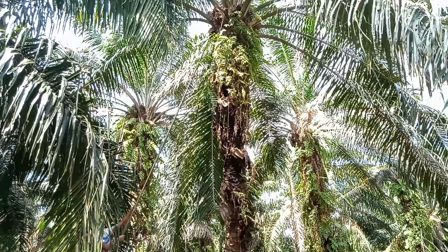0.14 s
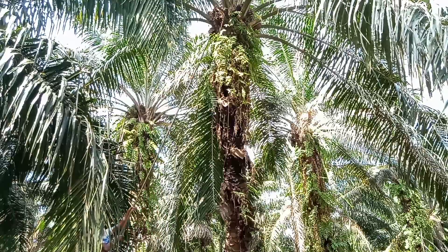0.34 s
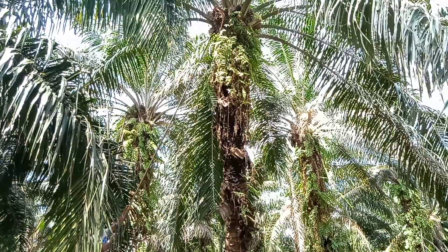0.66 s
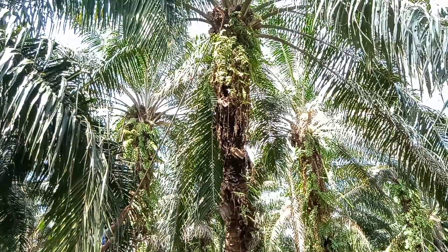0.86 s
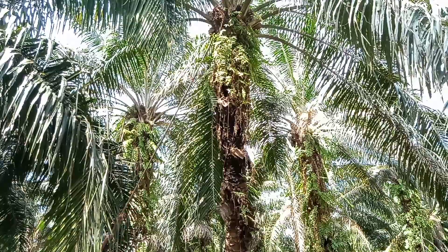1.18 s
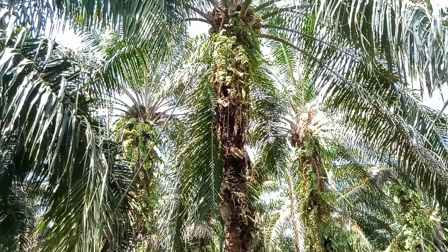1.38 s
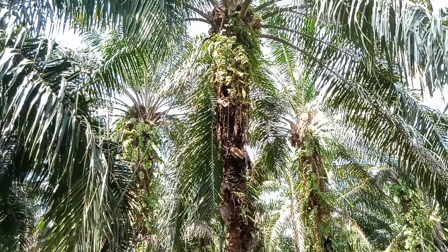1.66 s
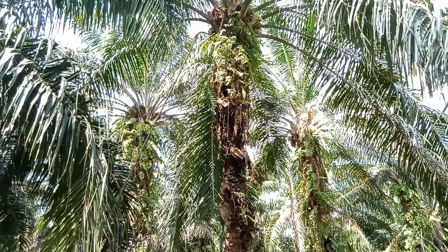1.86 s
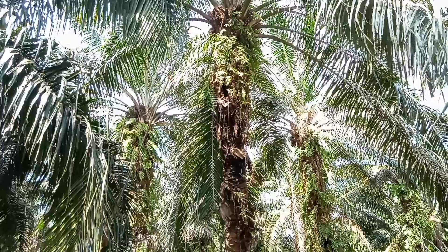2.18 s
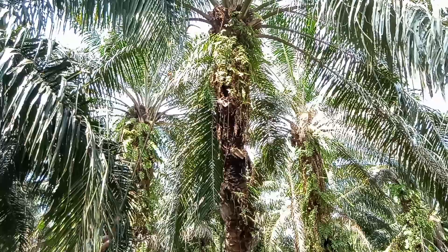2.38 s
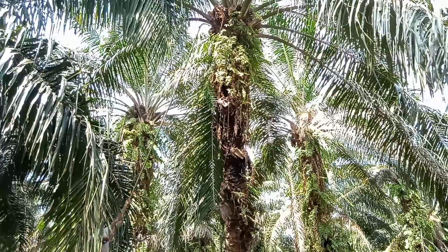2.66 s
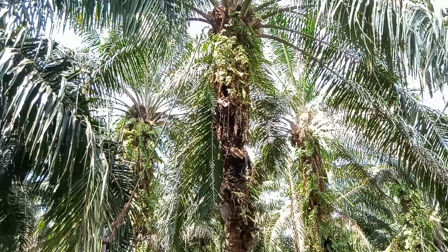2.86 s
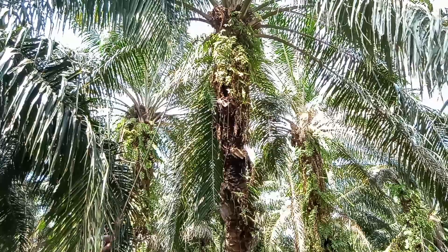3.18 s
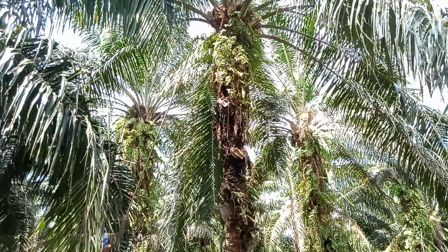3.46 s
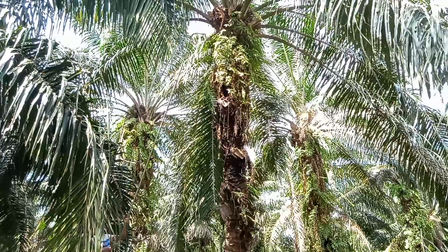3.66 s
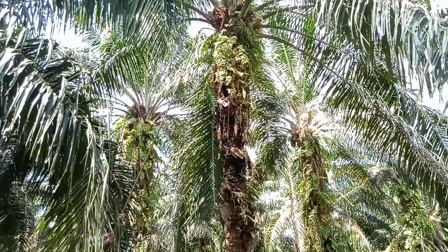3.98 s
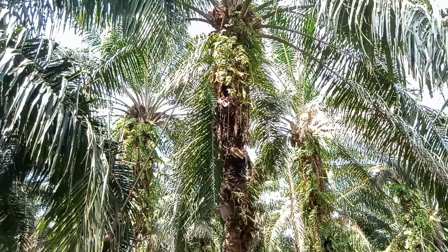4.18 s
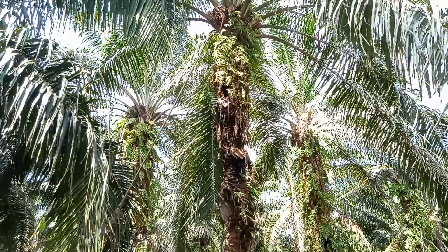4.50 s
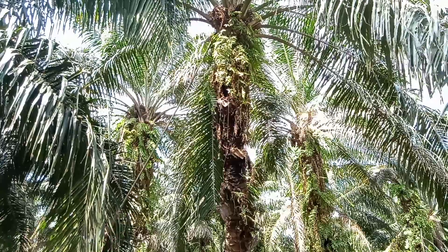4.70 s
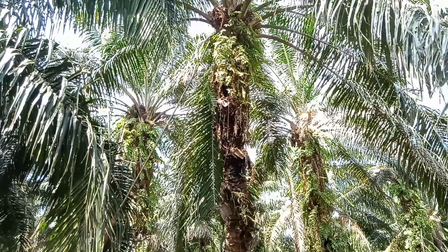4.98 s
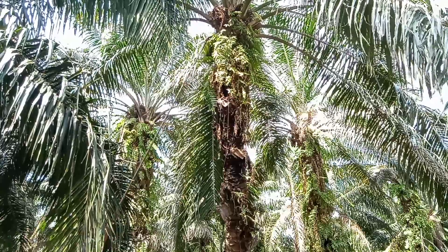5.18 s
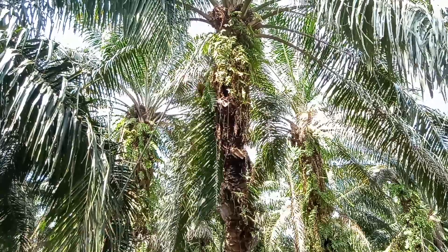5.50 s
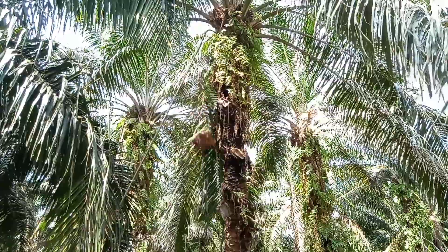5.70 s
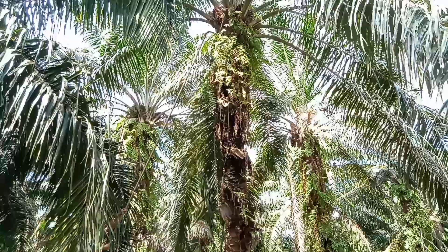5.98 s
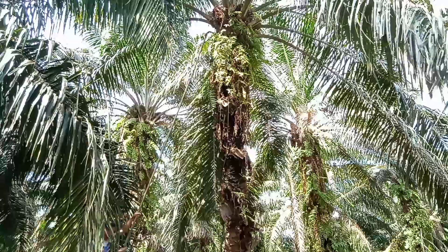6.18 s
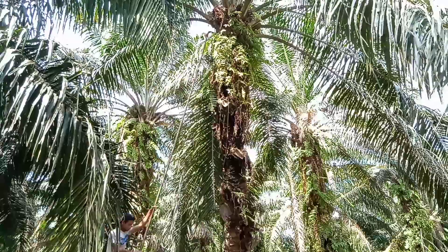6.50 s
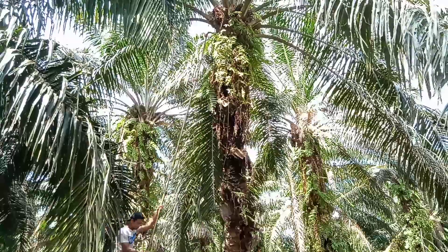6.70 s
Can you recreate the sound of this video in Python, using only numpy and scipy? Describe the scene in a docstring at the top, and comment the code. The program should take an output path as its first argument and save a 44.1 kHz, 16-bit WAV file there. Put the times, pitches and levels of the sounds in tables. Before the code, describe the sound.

Short rasping cuts and knocks in a palm end in falling leaves and a thud, while insects drone shrilly outdoors.

```python
"""Insects drone while a pole sickle rips through fibrous stalks high in an oil palm, in short tugs.
Fibres rasp and snap, the stalk rings, the pole knocks; a few thin chirps sound in between.
Cut fronds swish down through the crown and a fruit bunch thuds onto soft soil.
The plantation scatters the cutting and rustling back to a small, bright microphone."""
import sys
import numpy as np
from scipy import signal
from scipy.fft import rfft, irfft
from scipy.io import wavfile
from scipy.ndimage import uniform_filter1d

SR = 44100
rng = np.random.default_rng(int(sys.argv[2]) if len(sys.argv) > 2 else 0)


def generate_wav(signal):
    """Clip the signal to [-1, 1] and save it as 16-bit WAV at the path in sys.argv[1]."""
    frames = np.transpose(np.atleast_2d(signal))
    scaled = np.clip(frames, -1, 1) * 32767
    pcm = np.round(scaled).astype(np.int16)
    wavfile.write(sys.argv[1], SR, pcm)


N = 302085
TIME = np.arange(N) / SR

# woody stalk spectrum (frequency [Hz], level [dB])
STALK_SPECTRUM = [(250, -33.5), (480, -18.5), (680, -1.5), (820, 0), (1050, 0), (1350, 2.5), (1750, -3.5),
                  (2400, -6.5), (4500, -38)]
# tearing fibre spectrum (frequency [Hz], level [dB])
RASP_SPECTRUM = [(300, -17.5), (900, -6), (1800, -1.5), (3400, -6), (6500, -4.5), (10000, 0.5), (15500, -7)]
# shaking frond spectrum (frequency [Hz], level [dB])
SHUDDER_SPECTRUM = [(35, -40), (80, -6.5), (130, -2), (205, 0), (310, -2), (450, -5.5), (700, -14.5),
                    (1500, -43.5)]


def gain_of(db):
    """Decibels to amplitude."""
    return 10 ** (np.asarray(db) / 20)


def unit_rms(x):
    """Scales to rms 1."""
    return x / np.sqrt(np.mean(x ** 2) + 1e-20)


def at_hz(points, hz):
    """Interpolates a table on a log-frequency axis."""
    f, value = np.transpose(points)
    return np.interp(np.log(hz + 1), np.log(f + 1), value)


def envelope(times_s, db):
    """Gain along a dB curve, silent outside it."""
    return gain_of(np.interp(TIME, times_s, db, left=-120, right=-120))


def add(mix, at_s, sound):
    """Mixes a sound in, in place."""
    part = mix[round(at_s * SR):][:len(sound)]
    part += sound[:len(part)]


def colour(x, spectrum, keep_power=True, size=4096):
    """Minimum-phase filter; by default keeps the power of white noise."""
    log_gain = np.log(gain_of(at_hz(spectrum, abs(np.fft.fftfreq(size, 1 / SR)))))
    taps = np.fft.ifft(np.exp(np.conj(signal.hilbert(log_gain)))).real[:size // 2]
    return signal.oaconvolve(x, taps / np.linalg.norm(taps) if keep_power else taps)[:N]


def wander(cutoff_hz):
    """Smooth random drift, rms 1."""
    hz = np.fft.rfftfreq(N, 1 / SR)
    return unit_rms(irfft(rfft(rng.standard_normal(N)) / (1 + (hz / cutoff_hz) ** 4), N))


def crackle(per_s, spread_db):
    """Tiny random fractures, a few much larger than the rest."""
    size = gain_of(spread_db * np.minimum(rng.exponential(1, N), 4))
    return unit_rms(size * rng.choice([-1, 1], N) * (rng.random(N) < per_s / SR))


def patchy(x, depth_db, size=256):
    """Briefly lifts and lowers random narrow bands; output rms 1."""
    bands = signal.stft(x, nperseg=size)[2]
    field = uniform_filter1d(rng.standard_normal(bands.shape), size=3, axis=0)
    field = unit_rms(uniform_filter1d(field, size=7, axis=1))
    bands = bands * gain_of(depth_db * np.minimum(field, 1.8))
    return unit_rms(signal.istft(bands, nperseg=size)[1][:N])


def insects_and_air(throb_db=0.6, pulse_db=2.0, fade_db_per_s=88):
    """Distant insects merge into a shrill band; a nearer one sings in phrases over murmuring air."""
    # air and distant chorus spectra (frequency [Hz], density [dB/Hz])
    air_spectrum = [(20, -93), (80, -75.5), (250, -84), (500, -91), (1200, -88.5), (1650, -89.5),
                    (2200, -101), (3500, -102), (6500, -107), (16000, -112)]
    chorus_spectrum = [(5900, -125), (6850, -93.5), (7400, -69), (8000, -67), (8550, -70.5), (9100, -79),
                       (10300, -87), (12000, -102), (14200, -101), (15100, -82), (15800, -78)]
    # chorus swell (time [s], gain [dB])
    swell = [(0, 0), (2, 0), (3.5, 2.5), (6.85, 2)]
    # near insect's spectrum (frequency [Hz], level [dB])
    song_spectrum = [(4700, -35), (5350, -7.5), (5600, 2), (5780, 3), (5920, -2), (6200, -23)]
    # its phrases (start [s], length [s], level [dB])
    phrases = [(0, 0.73, -64.5), (1.2, .35, -65.5), (2.7, 0.69, -59), (3.8, 0.52, -62.5), (4.8, 3.8, -55)]
    air, chorus, singer = rng.standard_normal((3, N))
    per_hz = np.sqrt(SR / 2)
    air = colour(per_hz * patchy(air, depth_db=5.5, size=1024), air_spectrum, keep_power=False)
    chorus = patchy(chorus, depth_db=1.0) * envelope(*np.transpose(swell))
    chorus *= gain_of(throb_db * wander(60))
    chorus = colour(per_hz * chorus, chorus_spectrum, keep_power=False)
    phrasing = sum(gain_of(db - fade_db_per_s * abs(TIME - np.clip(TIME, at_s, at_s + length_s)))
                   for at_s, length_s, db in phrases)
    singer = patchy(singer, depth_db=9.5, size=2048) * phrasing * gain_of(pulse_db * wander(30))
    return air + chorus + colour(singer, song_spectrum)


def stroke(t, length_s, rise_share, t60_s):
    """Strain builds, holds while fibres give way, and lets go."""
    rise = np.minimum(t / (rise_share * length_s), 1)
    return rise * gain_of(-60 * np.maximum(t - length_s, 0) / t60_s)


def resonate(x, hz, width_hz):
    """Resonance following the curve hz."""
    carrier = np.exp(2j * np.pi * np.cumsum(hz) / SR)
    pole = np.exp(-np.pi * width_hz / SR)
    return (carrier * signal.lfilter([1], np.poly([pole, pole]), x / carrier)).real


def disperse(x, lag_s=0.00892):
    """Low bending waves travel slower, so the bass leaves the frond late."""
    hz = np.fft.rfftfreq(N, 1 / SR)
    delay_s = lag_s * np.maximum(np.sqrt(1000 / (hz + 100)) - 1, 0)
    return irfft(rfft(x) * np.exp(-2j * np.pi * np.cumsum(delay_s) * SR / N), N)


def rips(sag_per_s=6.45, hollow_db=-3.0, wood_db=-7, shake_db=-26, recoil_s=0.049, recoil_db=-17):
    """Tearing fibres rasp, shake the frond and ring the stalk, whose pitch sags as the cut opens."""
    # torn or crushed fibre (time [s], length [s], force [dB], rasp re force [dB], stalk pitch [Hz])
    tugs = [(0.406, 0.016, -39.5, -7.5, 1110), (0.571, 0.028, -31, -9.5, 1064),
            (0.624, .022, -43.5, -22, 1630), (0.774, 0.033, -39, -5.5, 1750),
            (0.8, 0.036, -26.5, -13.5, 1060), (0.97, .011, -40, -17, 1000), (1.05, .016, -43.5, -33, 1190),
            (1.12, 0.03, -36.5, -14, 1190), (1.567, 0.032, -24.5, -5, 955), (1.579, 0.055, -20, -1.5, 1256),
            (1.637, 0.019, -12, -2, 1100), (1.651, .085, -21, 2, 1440), (1.738, 0.052, -27, 1.5, 1140),
            (1.82, 0.035, -30, -6, 1220), (1.904, 0.016, -32, -6, 1220), (1.923, 0.011, -25.5, -3.5, 1270),
            (2.674, 0.015, -30.5, -12.5, 826), (2.727, 0.042, -32.5, -8, 1160),
            (2.801, .045, -32, -8.5, 1070), (2.862, 0.03, -47.5, 10.5, 760),
            (2.952, 0.052, -26.5, -14, 1045), (2.975, .035, -33, 3, 935), (3.011, 0.032, -18.5, -19, 870),
            (3.179, 0.065, -28, -10, 930), (3.33, 0.022, -31, -16, 970), (4.146, 0.041, -46, 14.5, 1810),
            (4.277, 0.072, -47, -4, 1590), (4.699, 0.027, -29.5, -5, 1164), (4.742, 0.037, -32.5, -9, 1225),
            (4.914, 0.023, -44, -25, 1270), (5, 0.033, -20, -3, 900), (5.014, 0.057, -12.5, -4.5, 1253),
            (5.069, 0.0052, -7.5, -2.5, 1355), (5.543, 0.057, -24.5, -5, 1190),
            (5.676, 0.024, -26, -10, 1260), (6.129, 0.028, -24.5, 11, 760), (6.511, 0.034, -34, 5.5, 760)]
    # jolts of the heavy frond or bunch (time [s], length [s], level [dB])
    jolts = [(0.8, .038, -44.5), (1.124, 0.041, -43.5), (1.594, .035, -35), (1.635, 0.015, -24),
             (1.66, .08, -30.5), (1.737, 0.041, -37.5), (2.672, 0.02, -36.5), (3.195, 0.094, -36.5),
             (4.142, 0.032, -47.5), (5.06, .02, -25), (5.095, 0.046, -31), (6.129, 0.023, -21),
             (6.505, 0.028, -26.5)]
    stalk_power, rasp_power, shudder_power, hollow = np.zeros((4, N))
    t = np.arange(SR // 3) / SR
    fibres = crackle(2500, 2.4)
    for at_s, length_s, force_db, rasp_db, hz in tugs:
        pull = stroke(t, length_s, rise_share=0.35, t60_s=0.073)
        add(stalk_power, at_s, (gain_of(force_db + wood_db) * pull) ** 2)
        # the springy pole drags the blade once more
        add(stalk_power, at_s + recoil_s, (gain_of(force_db + recoil_db) * pull) ** 2)
        tear = stroke(t, length_s, rise_share=0.3, t60_s=0.1)
        add(rasp_power, at_s, (gain_of(force_db + rasp_db) * tear) ** 2)
        pitch_hz = hz * np.exp(-sag_per_s * (t - length_s / 2))
        ring = pull * resonate(fibres[round(at_s * SR):][:len(t)], pitch_hz, width_hz=240)
        ring *= np.linalg.norm(pull) / np.linalg.norm(ring)
        add(hollow, at_s, gain_of(force_db + hollow_db) * ring)
    for at_s, length_s, db in jolts:
        jolt = stroke(t, length_s, rise_share=0.32, t60_s=0.079)
        add(shudder_power, at_s, (gain_of(db) * jolt) ** 2)
    shudder_power += gain_of(shake_db) ** 2 * rasp_power
    wood = np.sqrt(stalk_power) * patchy(crackle(2500, 3.9), depth_db=4.5, size=512)
    shudder = np.sqrt(shudder_power) * patchy(crackle(3000, 2.8), depth_db=6.5, size=1024)
    rasp = np.sqrt(rasp_power) * patchy(crackle(4000, 2.5), depth_db=3.5, size=512)
    body = hollow + colour(wood, STALK_SPECTRUM) + colour(shudder, SHUDDER_SPECTRUM)
    return disperse(body) + colour(rasp, RASP_SPECTRUM)


def leaf_tips(crown, stir_db=-26, t60_s=1.2, gust_at_s=3.86, gust_sigma_s=0.5, gust_db=-48.5):
    """Leaf tips, shaken by the work or a light gust, whisper and slowly settle."""
    # whisper spectrum (frequency [Hz], level [dB])
    tip_spectrum = [(1500, -9), (3800, -17.5), (5200, -3.5), (7000, -15), (15500, -2)]
    pole = np.exp(-np.log(10 ** 6) / (t60_s * SR))
    lingering_power = signal.lfilter([1 - pole], [1, -pole], crown ** 2)
    stir = gain_of(stir_db) * np.sqrt(lingering_power)
    gust = gain_of(gust_db) * np.exp(-.5 * ((TIME - gust_at_s) / gust_sigma_s) ** 2)
    whisper = patchy(crackle(8000, 1.5), depth_db=4.5, size=512)
    return colour(np.hypot(stir, gust) * whisper, tip_spectrum)


def snaps(rise_s=0.0013, splinter_db=-17, t60_s=.065, wood_db=-10):
    """A dry fibre bundle breaks within milliseconds and jars the stalk; splinters follow."""
    # fibre breaks (time [s], level [dB])
    breaks = [(0.581, -32.5), (0.809, -28), (1.926, -24.5), (2.724, -32), (3.019, -18), (3.746, -39.5),
              (4.151, -30), (4.639, -39.5), (4.713, -21), (5.077, -8), (5.085, -9.5), (5.129, -22.5),
              (5.688, -10.5), (5.805, -14), (5.845, -14), (6.058, -16.5), (6.138, -10.5), (6.482, -35)]
    bursts, t = np.zeros(N), np.arange(SR // 10) / SR
    shape = t / rise_s * np.exp(1 - t / rise_s) + gain_of(splinter_db - 60 * t / t60_s)
    for at_s, db in breaks:
        add(bursts, at_s, gain_of(db) * shape)
    crack = colour(bursts * patchy(rng.standard_normal(N), depth_db=1.5), RASP_SPECTRUM)
    wood = colour(bursts * rng.standard_normal(N), STALK_SPECTRUM)
    return crack + gain_of(wood_db) * wood


def chirps(waver_share=0.019):
    """Brief, slightly hoarse whistles."""
    # high whistles (time [s], length [s], level [dB], pitch [Hz])
    whistles = [(1.241, 0.054, -55.5, 3105), (2.813, 0.022, -30.5, 5690), (4.355, 0.025, -51, 3660)]
    out, drift = np.zeros(N), wander(540)
    for at_s, length_s, db, hz in whistles:
        pitch_hz = hz * (1 + waver_share * drift[round(at_s * SR):][:round(length_s * SR)])
        tone = np.sin(2 * np.pi * np.cumsum(pitch_hz) / SR)
        add(out, at_s, gain_of(db) * signal.windows.tukey(len(tone), .6) * tone)
    return out


def blade(mode_hz=3290, t60_s=0.23):
    """One thin steel mode rings after the sickle slips out of the cut."""
    # blade slips (time [s], level [dB])
    slips = [(1.925, -38), (4.713, -45)]
    out, t = np.zeros(N), np.arange(SR // 3) / SR
    for at_s, db in slips:
        add(out, at_s, gain_of(db - 60 * t / t60_s) * np.sin(2 * np.pi * mode_hz * t))
    return out


def knocks(peak_s=0.0021):
    """The pole hits a frond base; wet wood answers with only a few cycles."""
    # pole hits (time [s], level [dB], pitch [Hz])
    hits = [(2.677, -13.5, 874), (2.984, -5, 1030)]
    out, t = np.zeros(N), np.arange(SR // 20) / SR
    shape = (t / peak_s * np.exp(1 - t / peak_s)) ** 3
    for at_s, db, hz in hits:
        add(out, at_s, gain_of(db) * shape * np.sin(2 * np.pi * hz * t))
    return out


def fronds(loud_db=-20.5, rub_db_per_db=1.177, buffet_db_per_db=1.23,
           slaps_per_s=22, slap_s=.0015, slap_db=7):
    """Leaflets slap and slide as a frond sweeps down; its stalk rubs and its blade buffets the air."""
    # the frond sagging, falling and coming to rest (time [s], level [dB])
    sag = [(3.0, -38), (3.054, -32.5), (3.11, -35), (3.326, -37.5), (3.506, -59), (3.7, -61)]
    fall = [(5.17, -38), (5.252, -40), (5.386, -27.5), (5.418, -31), (5.546, -26), (5.552, -21.5),
            (5.662, -26), (5.694, -19.5), (5.702, -27.5), (5.8, -28.5), (5.808, -21.5), (5.826, -23.5),
            (5.996, -24), (6.038, -34.5), (6.13, -35.5)]
    rest = [(6.17, -24), (6.252, -37.5), (6.476, -49), (6.48, -41.5), (6.532, -35.5), (6.694, -46),
            (6.85, -49)]
    # leaflet spectrum (frequency [Hz], level [dB])
    leaf_spectrum = [(300, -19.5), (900, -18), (1800, -9), (3200, -3.5), (6500, -5), (10000, 1.5),
                     (15500, -3.5)]
    swish, rub, buffet = np.zeros((3, N))
    for curve, swish_db, rub_db, buffet_db in (
            (sag, 4.9, 4.2, -4.5), (fall, 6.07, 0, -10), (rest, 6.5, -1.5, -6.5)):
        times_s, db = np.transpose(curve)
        swish += envelope(times_s, db + swish_db)
        # rub and buffeting fade faster than the swish
        rub += envelope(times_s, loud_db + rub_db + rub_db_per_db * (db - loud_db))
        buffet += envelope(times_s, loud_db + buffet_db + buffet_db_per_db * (db - loud_db))
    impacts = rng.random(N) * (rng.random(N) < slaps_per_s / SR)
    slaps = signal.lfilter([1], [1, -np.exp(-1 / (slap_s * SR))], impacts)
    swish *= 1 + gain_of(slap_db) * slaps
    swish *= patchy(crackle(8000, 2.6), depth_db=1.0, size=512)
    rub *= patchy(crackle(3000, 2.9), depth_db=2.5, size=512)
    buffet *= crackle(2200, 2.3)
    return colour(swish, leaf_spectrum) + colour(rub, STALK_SPECTRUM) + colour(buffet, SHUDDER_SPECTRUM)


def landing(at_s=6.141, rise_s=0.0082):
    """The heavy bunch sinks into soft soil with a deep, dry thud."""
    # thud modes (frequency [Hz], level [dB], t60 [s])
    modes = [(72, -7.5, 0.16), (100, -1.5, 0.088), (178, 2.5, 0.059), (334.5, 6, 0.042), (386, 1.5, 0.053),
             (660, -0.5, 0.028)]
    out, t = np.zeros(N), np.arange(SR // 3) / SR
    attack = np.sin(np.minimum(t / rise_s, 1) * np.pi / 2) ** 2
    for hz, db, t60_s in modes:
        add(out, at_s, gain_of(db - 60 * t / t60_s) * attack * np.sin(2 * np.pi * hz * t))
    return out


def crown_reflections(x):
    """Close reflections comb the spectrum; the crown sounds hollow."""
    # off the trunk and nearest fronds (delay [s], gain [ratio])
    reflections = [(.0021, -0.054), (.0037, 0.044), (.0058, .2)]
    out = x.copy()
    for delay_s, gain in reflections:
        add(out, delay_s, gain * x)
    return out / np.sqrt(1 + sum(gain ** 2 for _, gain in reflections))


def grove_echoes(x, gap_samples=20):
    """Trunks and leaves scatter sparse echoes, each band dying at its own rate."""
    # echo decay (frequency [Hz], t60 [s])
    decay = [(100, 0.073), (400, 0.088), (1200, 0.34), (3500, 0.45), (7000, 0.36), (15000, 0.35)]
    taps = np.zeros(SR)
    slots = np.arange(SR // 200, SR - gap_samples, gap_samples)
    taps[slots + rng.integers(0, gap_samples, len(slots))] = rng.choice([-1., 1.], len(slots))
    hz, t, bands = signal.stft(taps, SR, nperseg=256)
    tail = signal.istft(bands * gain_of(-60 * t / at_hz(decay, hz)[:, None]), SR, nperseg=256)[1]
    return signal.fftconvolve(x, tail / np.linalg.norm(tail))[:N]


def scene(echo_db=-10):
    """The harvest, its echoes and the insects, in mono."""
    crown = rips() + fronds()
    work = crown_reflections(crown + leaf_tips(crown)) + snaps() + blade() + chirps()
    echoes = gain_of(echo_db) * grove_echoes(work)
    return (work + echoes + knocks() + landing() + insects_and_air())[None]


def record(dry, cutoff_hz=15900):
    """Microphone colour, overload on the hardest cracks, band limit."""
    # microphone response (frequency [Hz], gain [dB])
    response = [(20, -13), (70, -7), (1900, -2.5), (2400, -3), (3200, 5), (4150, -1), (5000, 8), (6600, 9),
                (8000, -12), (9300, -21.5), (13000, -21.5), (14300, -5.5), (15100, 4.5), (15700, 2)]
    clipped = np.clip(colour(dry[0], response, keep_power=False), -1, 1)
    lowpass = signal.firwin(511, cutoff_hz, window=("kaiser", 9), fs=SR)
    return signal.oaconvolve(clipped, lowpass, "same")[None]


dry = scene()
out = record(dry)
generate_wav(out)
```